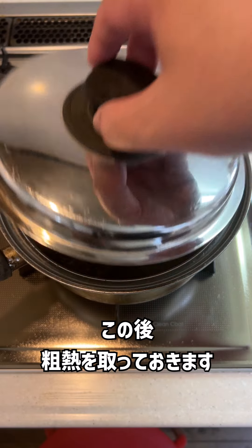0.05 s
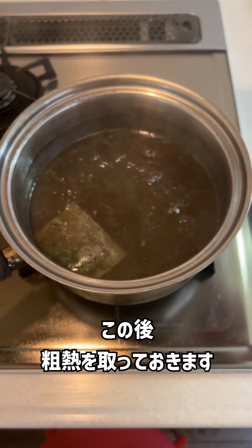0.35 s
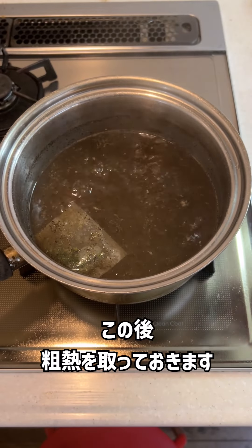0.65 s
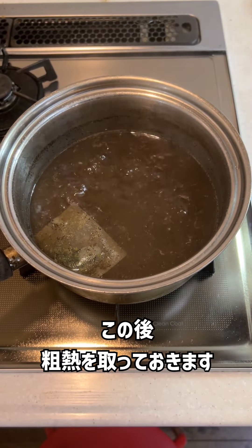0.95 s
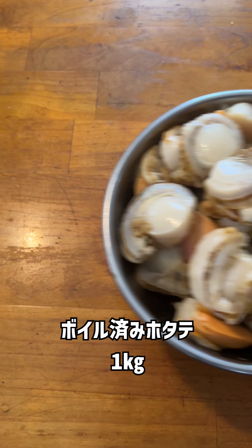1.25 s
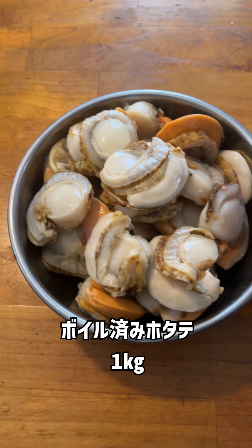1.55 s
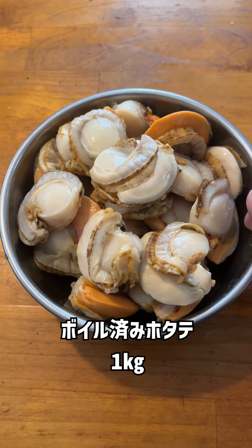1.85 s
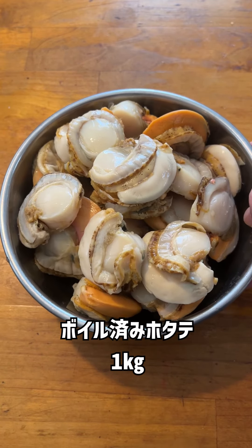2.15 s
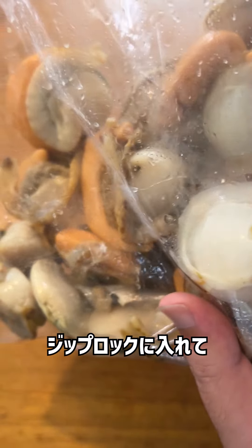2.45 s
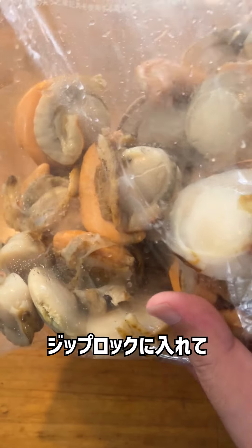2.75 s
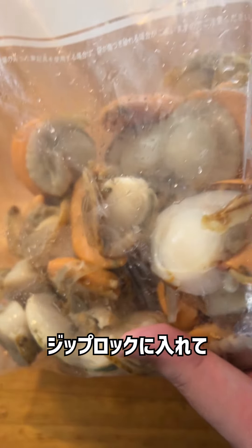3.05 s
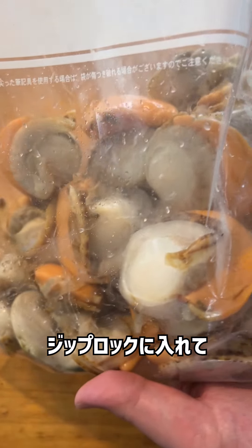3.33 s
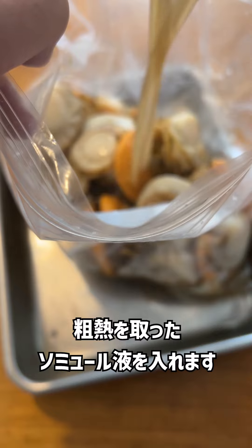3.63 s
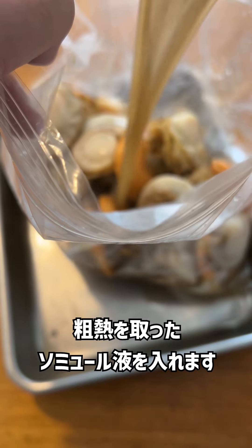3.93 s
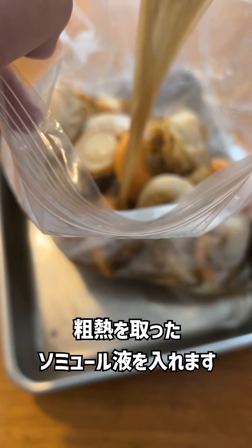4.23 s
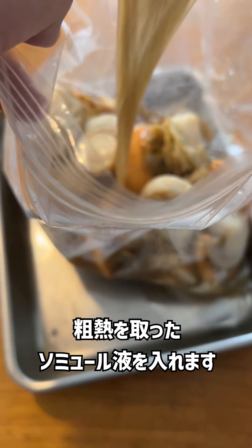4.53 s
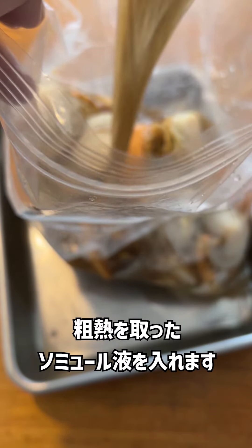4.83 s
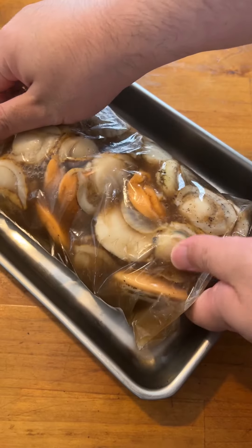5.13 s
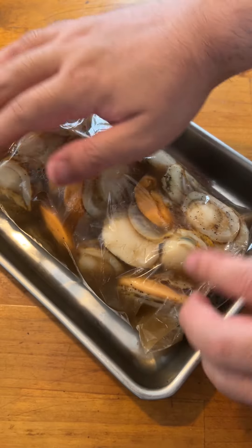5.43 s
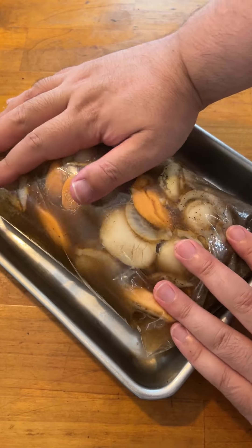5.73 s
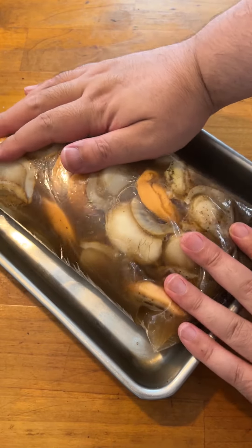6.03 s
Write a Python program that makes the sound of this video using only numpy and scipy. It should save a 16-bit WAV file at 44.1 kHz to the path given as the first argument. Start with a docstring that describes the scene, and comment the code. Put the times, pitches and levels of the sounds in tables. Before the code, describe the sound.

Faint gas stove hiss, one hard bowl knock on a table, wet scallops shifting in crackling plastic, brine pouring in, and soft pats.

```python
"""Close-up kitchen work in a small room. First a pot of brine ticks and pops over a rushing gas flame. The
stove's sound stops, and a steel bowl of scallops lands on a wooden table and sets it ringing. The scallops
slide about in a plastic bag whose creases crinkle and snap. Brine pours in, bubbling and spraying. Last, the
full bag thuds into a steel tray and is patted flat, and a fridge's drone swells."""
import sys
import numpy as np
from scipy import signal
from scipy.fft import rfft, irfft, next_fast_len
from scipy.io import wavfile
from scipy.ndimage import map_coordinates

SR = 44100
rng = np.random.default_rng(int(sys.argv[2]) if len(sys.argv) > 2 else 0)


def wav_record(signal):
    """Record a signal, one row per channel, as 16-bit PCM in the file named by sys.argv[1]."""
    frames = np.transpose(np.atleast_2d(signal))
    bounded = np.clip(frames, -1, 1)
    # unit amplitude maps onto the largest positive 16-bit level
    quanta = np.round(bounded * 32767).astype(np.int16)
    wavfile.write(sys.argv[1], SR, quanta)


N = 276933
TIME = np.arange(N) / SR
STOVE_END, SHAKE_START, POUR_START, POUR_END, FRIDGE_OPEN = 1.08, 2.224, 3.48, 5.042, 6.1  # cues, t/s
CENTRE = np.array([[1], [0]])  # layers are (mid, side) pairs; this feeds the mid alone


def amp(db):
    """Decibels to gain."""
    return 10 ** (np.asarray(db) / 20)


def unit(x):
    """Scale to rms 1."""
    return x / np.sqrt(np.mean(x ** 2) + 1e-20)


def along(points, hz):
    """Read (f/Hz, value) points on a log frequency axis."""
    freqs, values = np.transpose(points)
    return np.interp(np.log(hz + 1), np.log(freqs + 1), values)


def eq(points):
    """The frequency response of an EQ curve of (f/Hz, level/dB) points."""
    return lambda hz: amp(along(points, hz))


def gate(start, end):
    """Open from start to end, with 5 ms fades."""
    return np.clip(np.minimum(TIME - start, end - TIME) / .005, 0, 1)


def add(track, s, sound):
    """Mix a sound in at s seconds."""
    part = track[..., max(round(s * SR), 0):][..., :sound.shape[-1]]
    part += sound[..., :part.shape[-1]]


def filtered(x, response):
    """Apply a frequency response to x."""
    size = next_fast_len(x.shape[-1] + 8192)
    return irfft(rfft(x, size) * response(np.fft.rfftfreq(size, 1 / SR)), size)[..., :x.shape[-1]]


def coloured(x, curve, size=2048):
    """Minimum-phase EQ, so that clicks keep their sharp attacks."""
    gain = amp(np.maximum(along(curve, np.fft.rfftfreq(size, 1 / SR)), -90))
    cepstrum = irfft(np.log(gain))
    fold = 1 + np.sign(size / 2 - np.arange(size))
    fold[0] = 1
    impulse = irfft(np.exp(rfft(cepstrum * fold)))
    return signal.oaconvolve(x, impulse[None], axes=1)[:, :N]


def noise(response):
    """Shaped mid and side noise of rms 1."""
    return unit(filtered(rng.standard_normal((2, N)), response))


def wobble(rate):
    """A smooth random modulator with rate knots a second."""
    return map_coordinates(rng.standard_normal(int(N * rate / SR) + 4), [TIME * rate])


def hum(hz, waver):
    """A tone of rms 1 whose phase drifts by about waver radians."""
    return unit(np.sin(2 * np.pi * hz * TIME + waver * wobble(11)))


def grains(span, rate, band_hz, cycles, spread_db, curve, size=500):
    """A cloud of tiny rings, rate a second, uneven in level, pitch and pan; rms 1 within the span."""
    start, end = span
    low, high = band_hz
    count = int(max(rate * (end - start), 1))
    when, pitch, strength, pan, life = rng.random((count, 5)).T[..., None]
    hz = low * (high / low) ** pitch
    phase = hz * np.arange(size) / SR
    age = phase / (cycles * (.5 + life))
    rarity = -np.log(strength + .04)  # a few grains stand out
    envelope = hz * amp(spread_db * rarity) * np.exp(-age) * (1 - np.exp(-3 * age))
    index = ((start + when * (end - start)) * SR).astype(int).clip(0) + np.arange(size)
    rings = [envelope * np.sin(2 * np.pi * (phase + turn)) for turn in (0, pan)]
    cloud = np.array([np.bincount(index.ravel(), ring.ravel(), N)[:N] for ring in rings])
    return unit(coloured(cloud, curve)) * np.sqrt((end - start) / (N / SR))


def ping(hz, cycles, rise, size=1100):
    """A short, randomly panned ring of peak 1; decay and rise are counted in cycles."""
    phase = hz * np.arange(size) / SR
    envelope = (1 - np.exp(-phase / rise)) ** 2 * np.exp(-phase / cycles)
    return envelope / envelope.max() * np.sin(2 * np.pi * (phase + np.array([[0], [rng.random()]])))


def gestures(rows, rise_s, fall_db_per_s):
    """Attack-hold-release envelopes, one for each level column of (t/s, hold/s, level/dB, ...) rows."""
    s, hold, *levels = np.transpose(rows)[..., None]
    attack = np.clip((TIME - s) / rise_s + 1, 0, 1)
    release = amp(-fall_db_per_s * np.maximum(TIME - s - hold, 0))
    return [np.linalg.norm(amp(db) * attack * release, axis=0) for db in levels]


def follow(gain, pivot_db, ratio):
    """An envelope that meets gain at pivot_db and moves ratio dB for each of its dB."""
    return amp(pivot_db) * (gain / amp(pivot_db)) ** ratio


# EQ of the still kitchen air: f/Hz, level/dB
AIR_EQ = [(30, -22), (60, -15.5), (130, -11), (160, -17.5), (245, -22), (375, -24.5), (440, -31.5),
          (860, -36.5), (1500, -38.5), (1900, -33), (2900, -44), (9000, -50.5), (16000, -57)]

def room_tone():
    """A bed of still air with a faint mains hum."""
    return amp(-72.5) * noise(eq(AIR_EQ)) + amp(-77) * hum(124, waver=.45) * CENTRE


def fridge():
    """The fridge's fan and drone swell once its door is open."""
    fan = noise(eq([(30, -17), (100, -12), (370, -3), (800, -14), (3000, -22)]))
    swell = np.clip((TIME - FRIDGE_OPEN) / .12, 0, 1)
    return amp(-62) * (fan + hum(62, waver=.2)) * swell


# EQ of the gas flame's rush: f/Hz, level/dB
FLAME_EQ = [(41, -33), (70, 1.5), (80, -13), (103, -5), (162, -14), (300, -17.5), (620, -22.5), (797, -25),
            (1470, -37), (2370, -46), (3330, -39), (4690, -37.5), (5500, -47), (7560, -60), (16000, -68)]
# Resonances of the burner's ports: f/Hz, width/Hz, level/dB
PORT_TONES = [(790, 126, 9), (2340, 470, 0), (2930, 180, -2), (3570, 130, -3), (4400, 180, -2),
              (4670, 87, 4)]

def stove():
    """The flame rushes and sings in the burner, a motor hums, and simmering brine ticks and pops."""
    def resonances(hz):
        return sum(amp(db) / (1 + ((hz - peak) / (width / 2)) ** 2) for peak, width, db in PORT_TONES)
    flame = amp(-65) * noise(eq(FLAME_EQ))
    ports = amp(-78) * noise(resonances)
    tick_eq = [(4000, 3), (7000, -6), (15000, 4)]
    simmer = amp(-89) * grains((0, STOVE_END), 380, (5600, 21000), 1.4, 7.5, tick_eq)
    add(simmer, .6, amp(-71) * ping(6440, cycles=12, rise=3.6))  # one larger bubble bursts
    add(simmer, .04, amp(-58.5) * ping(468, cycles=3.4, rise=1.9, size=8000))  # the lid hums as it lifts
    motor = amp(-57.5 - 3.1 * np.exp(-TIME / .3)) * hum(52, waver=.12)
    return (flame + ports + simmer + motor * CENTRE) * gate(-1, STOVE_END)


# Soft landings of the bag's load: t/s, level/dB, f/Hz
LANDINGS = [(2.263, -38.5, 73), (2.292, -38, 214), (2.431, -43, 108), (2.531, -37, 60.6),
            (2.846, -37.5, 78), (3.322, -43.5, 274), (4.666, -51, 246), (5.149, -45, 410),
            (5.158, -36.5, 122.4), (5.167, -43, 81), (5.172, -40, 239)]

def thuds():
    """The soft load drops against the bag or the tray and is still within a few swings."""
    track = np.zeros((2, N))
    for s, db, hz in LANDINGS:
        add(track, s, amp(db) * ping(hz, cycles=2, rise=.9, size=10000))
    return track


# Wet slaps inside the bag: t/s, level/dB, t60/s
SLAP_HITS = [(4.874, -44, 0.028), (5.124, -38, 0.099), (5.153, -41.5, 0.11), (5.891, -40.5, 0.03)]

def slaps():
    """Brine slaps against the film in short, dull splashes."""
    force, t = np.zeros(N), np.arange(SR // 4) / SR
    for s, db, t60 in SLAP_HITS:
        add(force, s, amp(db - 60 * t / t60) * (1 - np.exp(-t / .0013)))
    slap_eq = [(40, -24.5), (130, -3), (500, -9.5), (1200, .5), (2200, -7), (5000, -11), (16000, -30)]
    return force * noise(eq(slap_eq))


# Hand strokes over the full bag: t/s, hold/s, crinkle level/dB, palm hiss level/dB
STROKES = [(5.125, 0.056, -48.5, -57), (5.293, 0.0069, -51.5, -59.5), (5.34, 0.098, -67, -69.5),
           (5.425, 0.019, -52.5, -59.5), (5.635, .015, -58.5, -78), (5.722, 0.047, -51.5, -60),
           (5.81, 0.045, -56, -67), (5.98, 0.055, -62, -77), (6.085, 0.039, -50.5, -64),
           (6.2, 0.087, -64.5, -66)]
# EQs of the stretched film and of the plastic's finest fizz: f/Hz, level/dB
TAUT_FILM_EQ = [(250, -18), (500, -10), (900, -7), (1500, -1), (2500, 5.5), (4200, -4), (7000, -10.5),
                (10000, -18)]
FIZZ_EQ = [(3500, 0.5), (6300, 6.5), (9000, -3.5), (16000, -22)]

def patted_bag():
    """Hands smooth the full bag; the stretched film crackles finely and hisses under the palms."""
    crinkle, sheen = gestures(STROKES, rise_s=.024, fall_db_per_s=260)
    resting_crinkle_db, resting_sheen_db = -72.5, -84  # hands lying on the bag
    span = POUR_END, N / SR
    film = grains(span, 1200, (600, 7000), cycles=1.5, spread_db=5.2, curve=TAUT_FILM_EQ)
    fizz = grains(span, 1500, (5000, 15000), cycles=1.6, spread_db=4.5, curve=FIZZ_EQ)
    rub = noise(eq([(1000, -22), (4000, 5), (8000, -4), (15000, -11.5)]))
    clumps = amp(2.5 * wobble(110))
    crackle = amp(-1) * np.hypot(crinkle, amp(resting_crinkle_db)) * film
    hiss = np.hypot(sheen, amp(resting_sheen_db)) * (amp(-2.5) * fizz + amp(.5) * rub)
    return (crackle + hiss) * clumps * gate(POUR_END, np.inf)


# Shakes that let the scallops slide: t/s, hold/s, level/dB
SLIDES = [(2.236, 0.044, -39), (2.34, 0.088, -44), (2.49, 0.11, -44), (2.84, 0.014, -47.5),
          (3.125, 0.2, -51.5), (3.38, 0.052, -49.5)]
# EQs of the wet film and of the shifting load: f/Hz, level/dB
WET_FILM_EQ = [(150, -14.5), (300, -2), (700, 2.5), (1200, 1.5), (1700, -2), (2600, 1), (3900, -9.5),
               (5600, -19.5), (9000, -58)]
RUMBLE_EQ = [(15, -41), (25, -21), (45, 1), (70, 2.5), (152, -3), (306, -9), (337, -10.5), (450, -12.5),
             (580, -45), (990, -120)]

def shaken_bag():
    """Wet scallops slide down the bag: clumps of crinkle over a rumble, brighter the harder the shake."""
    held_db, firm_db = -59.5, -45  # the bag merely held; a firm grip
    slide, = gestures(SLIDES, rise_s=.023, fall_db_per_s=178)
    effort = np.hypot(slide, amp(held_db))
    span = SHAKE_START, POUR_START
    film = grains(span, 1000, (450, 8000), cycles=1, spread_db=5.6, curve=WET_FILM_EQ)
    fizz = grains(span, 700, (5000, 16000), cycles=1.2, spread_db=6.3, curve=FIZZ_EQ)
    crinkle = effort * film + amp(-13) * follow(effort, firm_db, ratio=1.28) * fizz
    rumble = amp(-3.5) * follow(effort, firm_db, ratio=.64) * noise(eq(RUMBLE_EQ))
    clumps = amp(3 * wobble(90))
    return (crinkle * clumps + rumble) * gate(*span)


# The stream of brine thickens, then runs steadily: t/s, level/dB
STREAM = [(3.49, -58), (3.65, -58.5), (3.87, -50), (4.1, -48.5), (4.25, -53), (4.4, -47), (4.6, -50),
          (4.8, -47), (5.035, -48)]
# The stream gulps air or strikes a scallop: t/s, hold/s, bubbling level/dB, spray level/dB
SURGES = [(3.55, 0.043, -70, -49), (3.89, 0.025, -40.5, -57), (4.035, 0.087, -46, -49.5),
          (4.31, .015, -40.5, -61), (4.71, 0.068, -49.5, -52), (4.869, 0.013, -59, -44),
          (4.945, 0.065, -53, -51)]
# EQs of the bag's hollow, the spray and the splash: f/Hz, level/dB
HOLLOW_EQ = [(1200, -50), (1580, -14.5), (1800, -3.5), (2200, 0), (2650, -2), (3100, -16), (4000, -46)]
SPRAY_EQ = [(2400, -1), (3300, -5.5), (4500, -2.5), (5600, -3.5), (6000, 4), (7700, -1.5), (8700, -5),
            (11000, -5.5), (13000, -2), (16000, -1)]
SPLASH_EQ = [(120, 16), (230, -5.5), (410, -3.5), (680, 5), (1080, -2), (1290, 7), (1550, -3), (2200, -81)]
# The fattest drops: t/s, level/dB, f/Hz
FAT_DROPS = [(3.686, -28.5, 7300), (3.896, -30, 2080), (4.045, -30.5, 1940), (4.283, -30, 6200),
             (4.322, -23.5, 2250), (4.723, -29.5, 2470), (4.785, -28.5, 2050)]

def pour():
    """The stream traps bubbles that ring in the bag, patters on the film and splashes on the scallops."""
    full_db = -48  # the full stream
    flow = amp(np.interp(TIME, *np.transpose(STREAM)))
    gulp, spurt = gestures(SURGES, rise_s=.0064, fall_db_per_s=350)
    spray_gain = np.hypot(amp(-2) * follow(flow, full_db, ratio=.61), spurt)
    splash_gain = flow * np.hypot(amp(-13), amp(-9.5 - full_db) * spurt)
    span = POUR_START, POUR_END
    bubbles = grains(span, 700, (1650, 3300), cycles=3.6, spread_db=4.5, curve=HOLLOW_EQ)
    patter = grains(span, 900, (4000, 12000), cycles=1.3, spread_db=6, curve=SPRAY_EQ)
    tiny_bubbles = grains(span, 1200, (3000, 12000), cycles=8, spread_db=5.5, curve=SPRAY_EQ)
    mist = noise(lambda hz: amp(along(SPRAY_EQ + [(17000, -62)], hz)) * (hz > 1500))
    spray = amp(-4.5) * patter + amp(-5) * tiny_bubbles + amp(-8) * mist
    flutter = amp(1.9 * wobble(160) + 1.7 * wobble(40))
    splash = grains(span, 1200, (207, 1660), cycles=2.46, spread_db=4, curve=SPLASH_EQ)
    track = np.hypot(flow, gulp) * bubbles + (spray_gain * spray + splash_gain * splash) * flutter
    for s, db, hz in FAT_DROPS:
        add(track, s, amp(db) * ping(hz, cycles=2.5, rise=1.6))
    return track


# The bag's loudest creases: t/s, ring level/dB, f/Hz, crack level/dB
CREASES = [(2.235, -31, 1000, -41), (2.278, -24, 1190, -39), (2.353, -24.5, 2930, -58),
           (2.453, -18.5, 1235, -42.5), (2.49, -31, 1280, -39), (2.53, -24, 2200, -39),
           (2.54, -25, 2270, -35.5), (2.58, -23.5, 2460, -39.5), (2.598, -25, 1850, -40.5),
           (2.715, -35.5, 815, -77), (2.795, -35.5, 2270, -68), (2.812, -28.5, 2320, -66),
           (2.849, -24.5, 2350, -51.5), (2.883, -28, 2550, -40.5), (2.919, -17, 2460, -42.5),
           (3.042, -24.5, 2870, -60), (3.097, -37, 1150, -46.5), (3.115, -33, 1550, -54),
           (3.202, -30, 1280, -54), (3.29, -26, 2840, -58), (3.319, -27.5, 2060, -52),
           (3.371, -22, 2670, -42), (3.402, -26.5, 4040, -63), (3.416, -30.5, 1150, -51),
           (3.459, -23, 1160, -46), (3.464, -26, 2288, -37), (5.127, -24, 3420, -60),
           (5.161, -24, 2630, -47), (5.295, -32, 2060, -48), (5.54, -19, 2810, -65),
           (5.681, -33, 2710, -45.5), (5.717, -30, 3000, -43.5), (5.737, -25, 3400, -51),
           (5.756, -42, 2260, -50.5), (5.81, -31, 3380, -55), (5.892, -34.5, 2640, -98),
           (5.944, -40.5, 2550, -86), (6.047, -33, 2130, -79), (6.121, -29, 2266, -55)]

def snaps(flip_s=.001024):
    """A crease flips over: a few cycles of the film's ring, an overtone, a low push and a bright crack."""
    track, t = np.zeros((2, N)), np.arange(SR // 40) / SR
    crack_eq = eq([(500, -5), (3000, 6), (6500, 5.5), (10000, -4.5), (16000, -12.5)])
    # small creases give way just before and after the big one
    burst = np.exp(-np.maximum((.003 - t) / .0009, (t - .003) / .0025))
    for s, ring_db, hz, crack_db in CREASES:
        ring = ping(hz, cycles=1.3, rise=.7)
        overtone = amp(-9) * ping(1.73 * hz, cycles=1, rise=1)
        push = amp(-17.5) * ping(.44 * hz, cycles=1, rise=.12)
        crack = filtered(rng.standard_normal((2, len(t))) * burst, crack_eq)
        add(track, s + flip_s, amp(ring_db) * (ring + overtone + push))
        add(track, s + flip_s - .0025, amp(crack_db + 10) * crack)
    return track


# Modes of the table top and the loaded bowl: f/Hz, level/dB, t60/s
KNOCK_MODES = [(84.6, -40.5, .3), (127.2, -27.5, 0.27), (181, -26.5, .2), (226.2, -22.5, 0.29),
               (285, -19, 0.12), (392, -23, 0.099), (469, -18, 0.074), (513.7, -21, 0.085),
               (627.5, -15, 0.089), (712.5, -25.5, .1), (805, -23, 0.029), (929, -9, 0.028),
               (993, -20, 0.01), (1197, -19.5, 0.028), (1320, -20, 0.02), (1630, -30.5, .03),
               (1925, -21, .03), (2120, -35.5, .05), (2400, -37.5, 0.017), (2510, -41.5, 0.031),
               (4150, -34, 0.052), (6300, -39.5, .02)]
# The bowl meets the table with one hard bright knock, a faint bright tap, then two dull bumps:
# t/s, level/dB, low-pass f/Hz
CONTACTS = [(1.549, 0, 6000), (1.603, -27, 4000), (1.750, -26.5, 250), (1.770, -21.5, 120)]

def bowl(lag_turns=.25):
    """The bowl lands hard, rocks and settles; each contact rings the table, low modes swelling slowest."""
    track, t = np.zeros((2, N)), np.arange(SR // 2) / SR
    bearing = np.array([[0], [2.2]])  # mid and side phase: the bowl stands to the right
    ring = 0
    for k, (hz, db, t60) in enumerate(KNOCK_MODES):
        envelope = amp(db - 60 * t / t60) * (1 - np.exp(-t * hz / 1.5))
        # the blow spreads through the wood: each mode lags the one below
        ring += envelope * np.sin(2 * np.pi * (hz * t - k * lag_turns) + bearing)
    slump_eq = [(20, -18), (50, 3), (200, 5.5), (600, -6.5), (1500, -14), (2200, -13), (5000, -28.5)]
    for s, db, cutoff_hz in CONTACTS:
        crack = rng.standard_normal((2, len(t))) * (amp(-27 - 60 * t / .02) + amp(-45.5 - 60 * t / .27))
        # the scallops slump in the bowl
        slump = coloured(rng.standard_normal((2, len(t))) * amp(-17 - 60 * t / .4), slump_eq)
        hit = crack + ring + slump[:, :len(t)]
        add(track, s, amp(db) * filtered(hit, lambda hz: 1 / (1 + 1j * hz / cutoff_hz)))
    return track


# Decay of the kitchen's reverb: f/Hz, t60/s
ROOM_DECAY = [(100, 0.28), (300, 0.29), (700, 0.26), (2500, 0.16), (8000, 0.19), (16000, 0.52)]

def room(x, wet_db, size=256):
    """Add the kitchen's short reverb, in which each frequency dies at its own speed."""
    hz, t, bands = signal.stft(rng.standard_normal((2, SR // 2)), SR, nperseg=size)
    decay = amp(-60 * t / along(ROOM_DECAY, hz)[:, None])
    _, tail = signal.istft(bands * decay, SR, nperseg=size)
    tail *= np.clip((np.arange(tail.shape[1]) / SR - .003) / .0013, 0, 1)  # 3 ms pre-delay
    return x + amp(wet_db) * signal.fftconvolve(x[:1], tail / np.linalg.norm(tail[0]), axes=1)[:, :N]


# Width of the stereo image: f/Hz, side level/dB
WIDTH_EQ = [(60, -23), (120, -20.5), (380, -7), (1000, -7), (2300, -19), (4400, -7), (8000, -4.5),
            (15000, -4.5)]

def stereo(pair):
    """Mid and side to left and right; the treble reaches the right a moment earlier."""
    mid, side = pair
    lead = filtered(mid, lambda hz: -.7j * np.tanh((hz / 7000) ** 2))
    spread = lead + filtered(side, eq(WIDTH_EQ))
    return np.array([mid + spread, mid - spread])


def scene():
    """Bowl, bag and brine, each with its reverb send, over the stove, room tone and fridge."""
    knock = room(bowl(), wet_db=-11)
    film = amp(-3) * snaps() + shaken_bag() + patted_bag() + slaps()
    bag = room(film, wet_db=-10.5)
    load = room(thuds(), wet_db=-6)
    brine = room(pour(), wet_db=-11) * gate(POUR_START, POUR_END)
    return stereo(stove() + room_tone() + fridge() + knock + bag + load + brine)


def record(dry):
    """A steep low-pass at 16.1 kHz takes off the very top."""
    return filtered(dry, lambda hz: 1 / (1 + (hz / 16100) ** 200))


dry = scene()
out = record(dry)
wav_record(out)
```